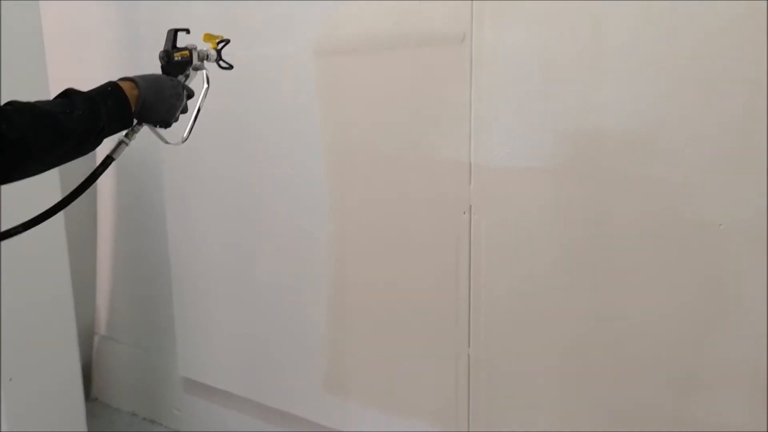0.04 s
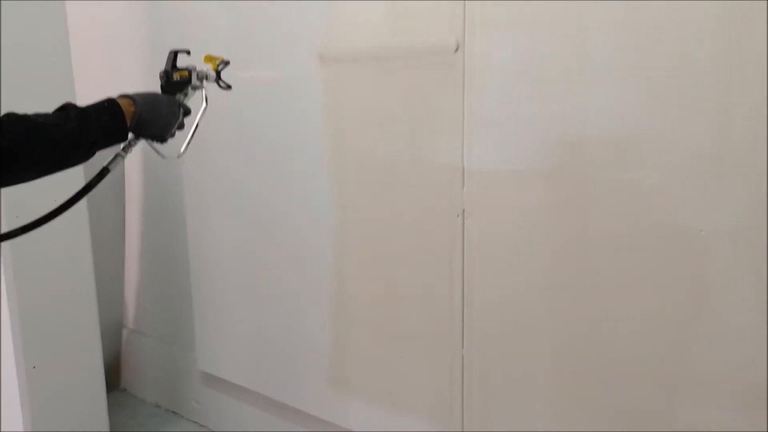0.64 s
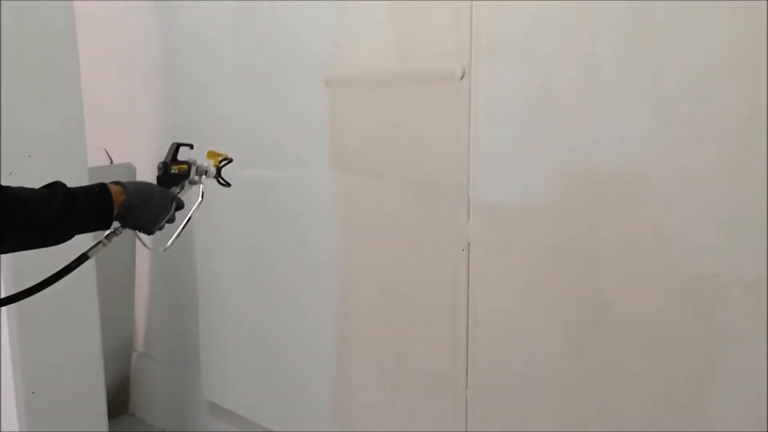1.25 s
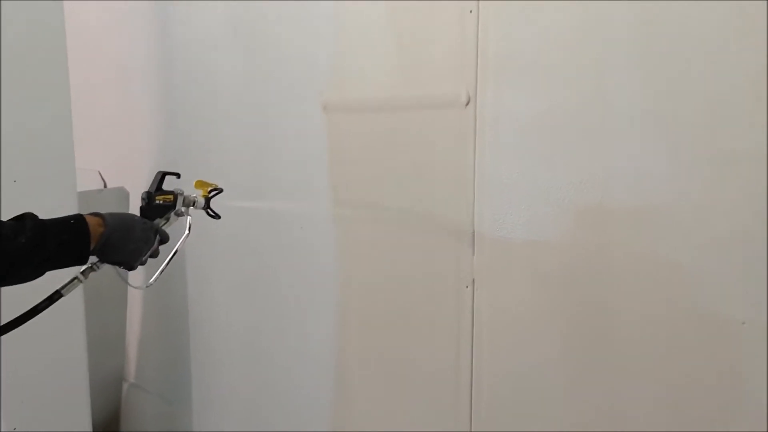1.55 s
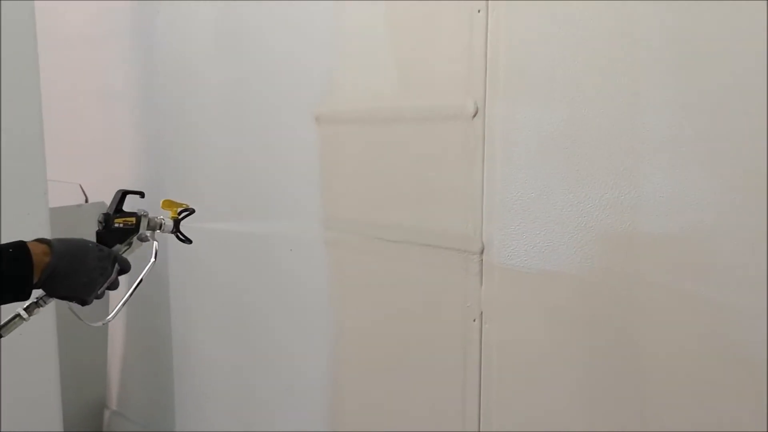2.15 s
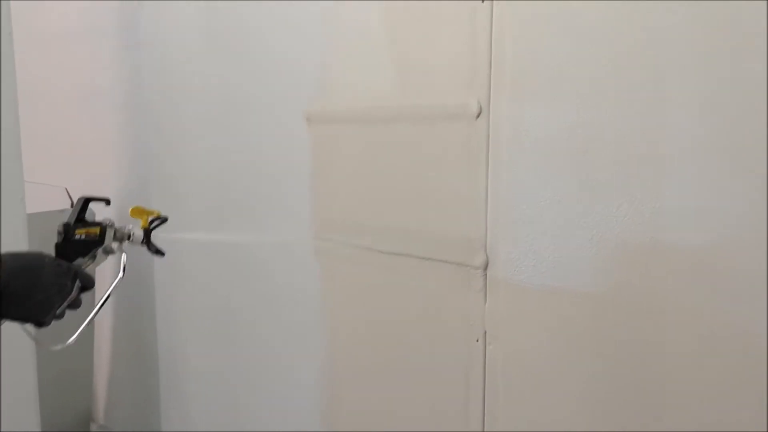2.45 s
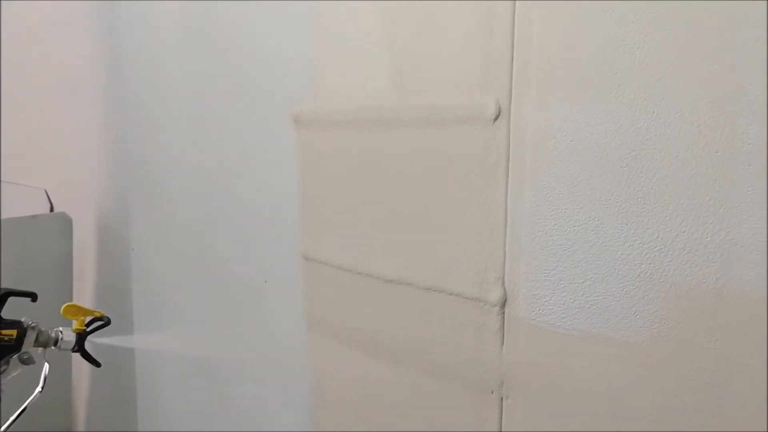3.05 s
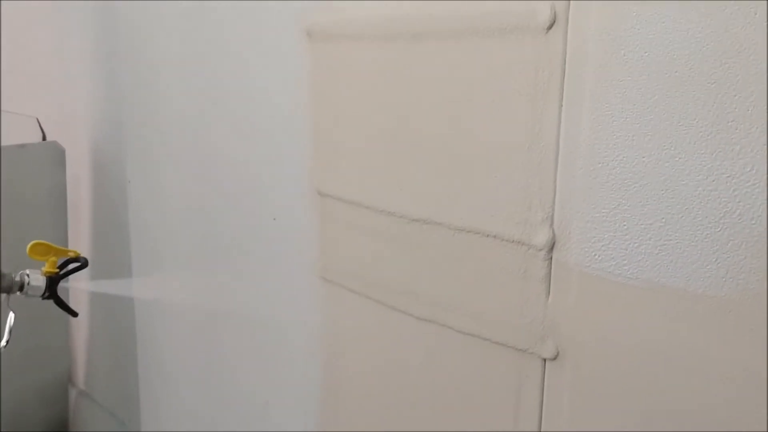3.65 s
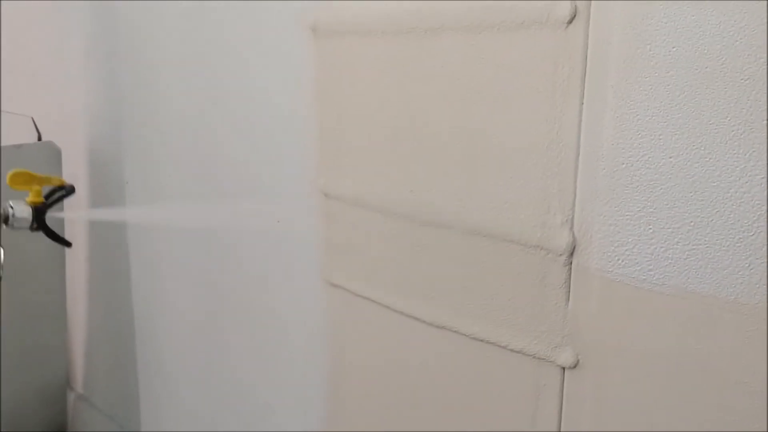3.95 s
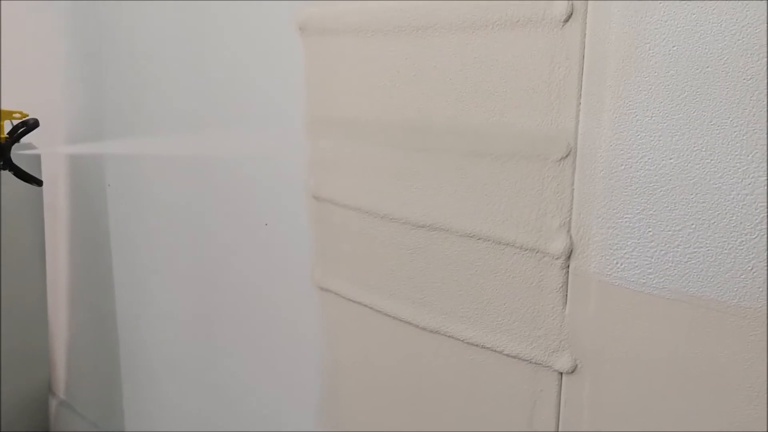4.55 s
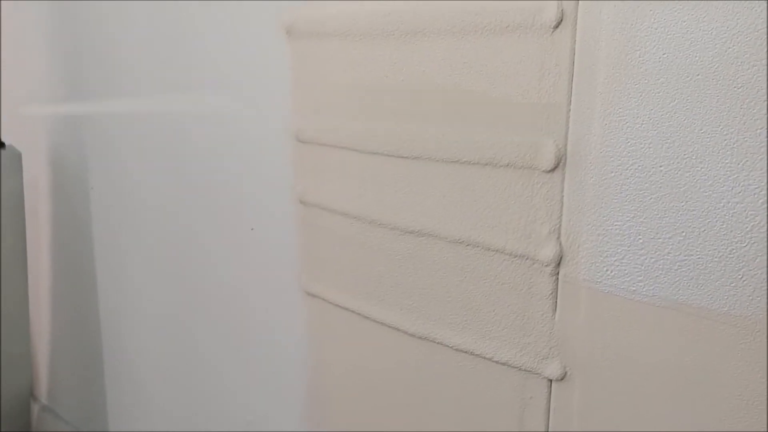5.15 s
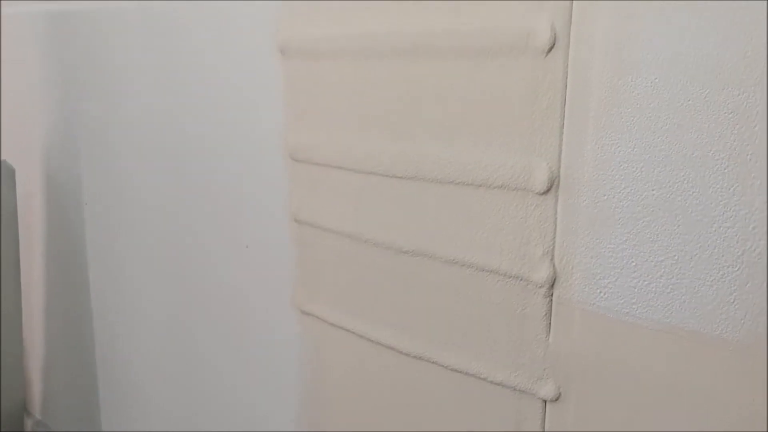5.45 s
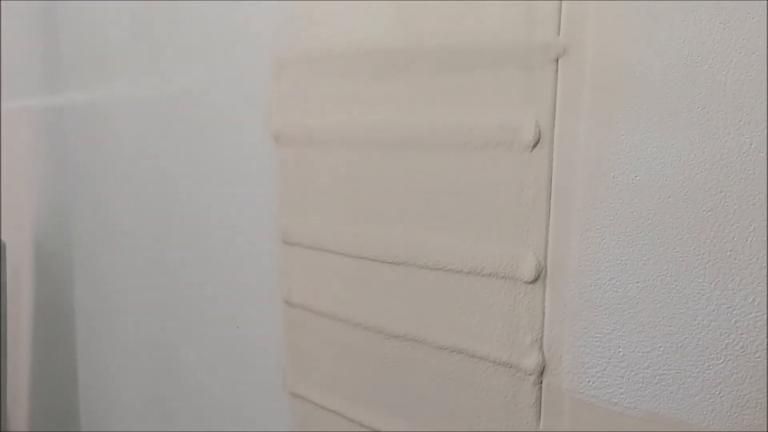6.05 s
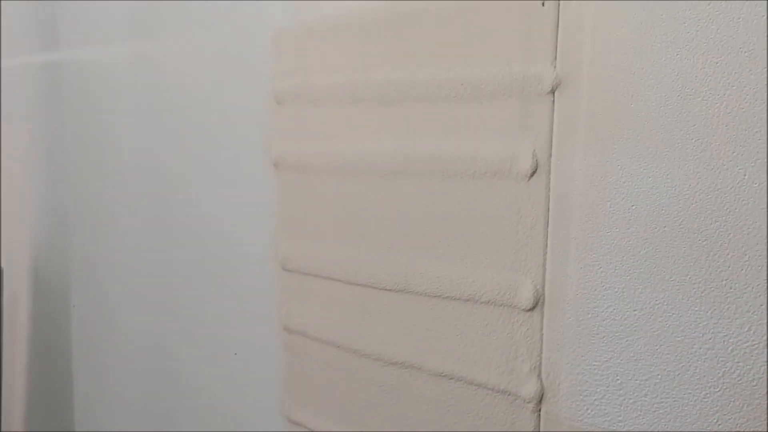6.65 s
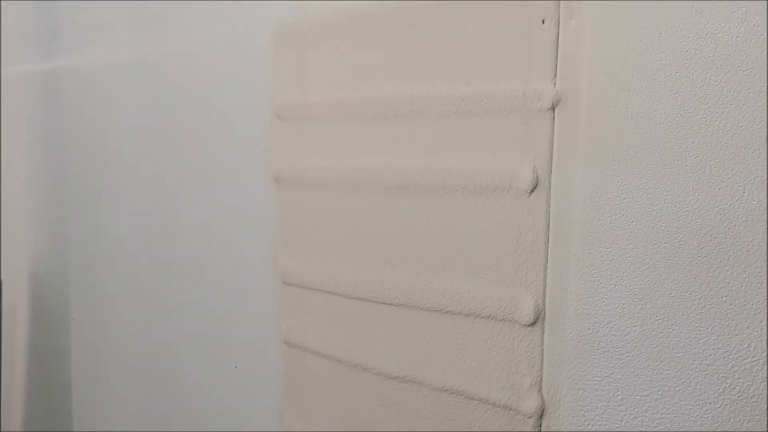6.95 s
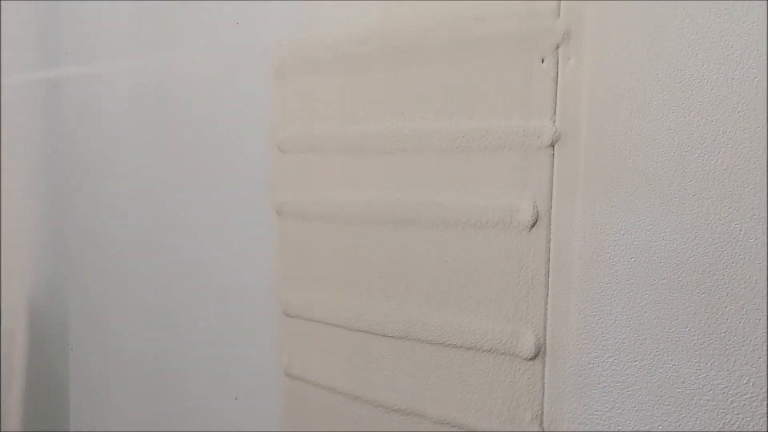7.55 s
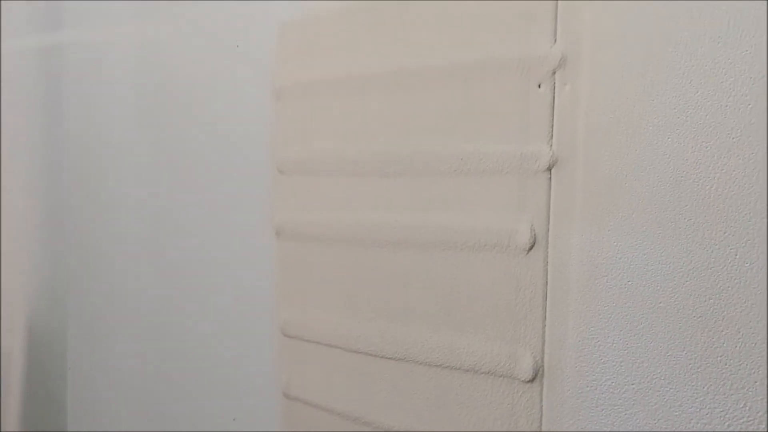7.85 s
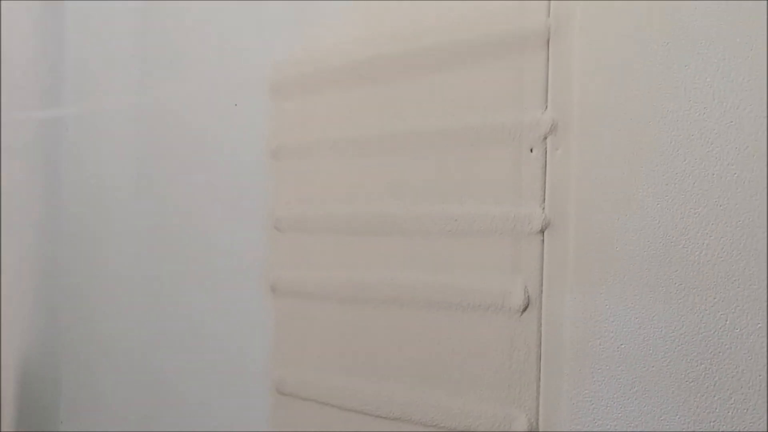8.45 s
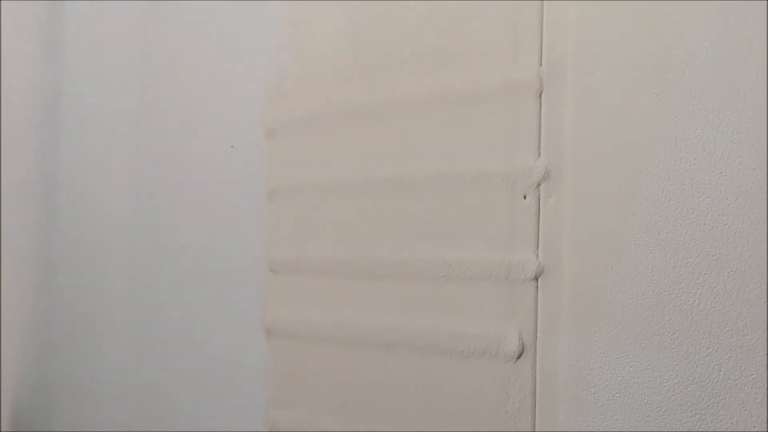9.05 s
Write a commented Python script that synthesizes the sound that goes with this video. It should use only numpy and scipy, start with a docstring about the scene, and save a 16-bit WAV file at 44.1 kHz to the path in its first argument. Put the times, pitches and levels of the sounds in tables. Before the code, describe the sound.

From start to finish, a spray gun shoots a high-pressure jet of filler at a wall, making a loud, steady hiss on the left. Slight downward sweeps colour the hiss, and a thin, airy whistle rises and fades three times. Far behind it are the faint, quickly pulsing hum of a pump and the soft rumble of the room.

```python
"""An airless spray gun blasts filler onto an indoor wall, off to the left, for about nine seconds.
From the start the jet hisses over a room rumble, faint low tones and a distant, throbbing piston pump.
Each time the fan lingers it digs a groove in the wet coat, and a band of the hiss sinks as it deepens.
The spray rings narrow resonances: the lower ones sag in pitch at 1 s, and the strongest swells
like a breathy whistle near 1.5, 5 and 7.7 s. The gun is still spraying at the end."""
import sys
import numpy as np
from scipy import signal
from scipy.fft import rfft, irfft, next_fast_len
from scipy.io import wavfile
from scipy.ndimage import map_coordinates

SR = 44100
rng = np.random.default_rng(int(sys.argv[2]) if len(sys.argv) > 2 else 0)


def transcribe(u):
    """Save the signal u as a 16-bit wav file named by the first command-line argument.

    u: samples, shape (n,) or (channels, n), limited to [-1, 1]; the rate is SR.
    q: integer samples, one column per channel.
    """
    v = np.clip(np.atleast_2d(u).T, -1, 1)
    q = np.round(v * 32767).astype(np.int16)
    wavfile.write(sys.argv[1], SR, q)


N = 410130
TIME = np.arange(N) / SR


def amp(db):
    """Decibels to gain."""
    return 10 ** (np.asarray(db) / 20)


def unit(x):
    """x at rms 1."""
    return x / np.sqrt(np.mean(x ** 2) + 1e-20)


def along(points, hz):
    """(Hz, value) points read on a log axis."""
    knots_hz, values = np.transpose(points)
    return np.interp(np.log(hz + 1), np.log(knots_hz + 1), values)


def curves(rows, t=TIME):
    """Each value column of a timed table at times t."""
    knots_s, *columns = np.transpose(rows)
    return [np.interp(t, knots_s, column) for column in columns]


def wobble(knots_per_s, t=TIME):
    """A smooth random curve."""
    return map_coordinates(rng.standard_normal(size=1024), [t * knots_per_s], mode="wrap")


def filtered(x, response):
    """x through a complex frequency response."""
    size = next_fast_len(N + SR // 2)
    return irfft(rfft(x, size) * response(np.fft.rfftfreq(size, 1 / SR)), size)[..., :N]


def resonance(hz, centre_hz, width_hz):
    """Response of one damped mode."""
    return 1j * hz * width_hz / (centre_hz ** 2 - hz ** 2 + 1j * hz * width_hz)


def bell(hz, centre_hz, octaves):
    """Gaussian band on a log axis, peak 1."""
    return np.exp(-.5 * (np.log2((hz + 1) / centre_hz) / octaves) ** 2)


def bent(x, pitch_ratio):
    """Stereo x with its pitch bent along a curve."""
    return np.array([map_coordinates(side, [np.cumsum(pitch_ratio)], mode="mirror") for side in x])


def noise_all_round(response, spread):
    """Low stereo noise of rms 1, nearly alike at both microphones."""
    mid, side = rng.standard_normal((2, N))
    side = filtered(side, lambda hz: np.minimum(spread + hz / 600, 1))
    return unit(filtered(np.array([mid + side, mid - side]), response))


# Room noise floor. Each row: frequency in Hz, relative density in dB.
FLOOR_SPECTRUM = [(20, -15), (60, 7.5), (100, 3), (160, 2), (240, 1), (310, -0.5), (400, -10), (600, -17),
                  (1500, -23)]

def room():
    """A deep, slowly swelling rumble under a soft steady floor."""
    rumble = noise_all_round(lambda hz: resonance(hz, centre_hz=28.1, width_hz=18) ** 2, spread=0.045)
    floor = noise_all_round(lambda hz: amp(along(FLOOR_SPECTRUM, hz)), spread=0.15)
    return rumble * amp(-52 + 2.2 * wobble(2)) + floor * amp(-51)


# Low tones. Each row: start and end in seconds, start and end pitch in Hz, top level in dB.
LOW_TONES = [(.34, 1.5, 96, 96, -55), (2.4, 3.7, 32, 36, -52), (5, 6.1, 57, 54, -50),
             (5.2, 10, 58, 62, -54), (6.75, 7.85, 51.5, 46, -42), (8.1, 9.6, 61, 66, -51.5)]

def low_tones():
    """Faint low tones come and go, wavering and gliding a little."""
    sound = np.zeros(N)
    for start_s, end_s, start_hz, end_hz, db in LOW_TONES:
        progress = np.clip((TIME - start_s) / (end_s - start_s), 0, 1)
        hz = start_hz + (end_hz - start_hz) * progress + .5 * wobble(5)
        swell = np.sqrt(np.abs(np.sin(np.pi * progress)))
        sound += amp(db) * swell * np.sqrt(2) * np.sin(2 * np.pi * np.cumsum(hz) / SR)
    return sound


# Motor load over one piston stroke. Each row: phase 0-1, relative load in dB at throb 1.
STROKE_LOAD = [(.04, -6), (.22, -11), (.33, -10), (.48, -2.5), (.64, -6), (.8, -1)]
# Pump levels. Each row: time in seconds, hum in dB, housing in dB, throb as a multiple of STROKE_LOAD.
PUMP_LEVELS = [(0, -49, -53, 1.5), (2.1, -55.5, -57, 1.1), (3, -47.5, -57, 0.55), (4.3, -48.5, -56, 1.1),
               (7, -46, -53, 0.77), (9.3, -48, -55.5, 1)]

def pump(stroke_hz=3.7037, hum_hz=200):
    """The motor hums at a mains harmonic, louder under load; every stroke shakes the housing alike."""
    hum_db, housing_db, throb = curves(PUMP_LEVELS)
    phase = TIME * stroke_hz % 1
    knots, load_db = np.transpose(STROKE_LOAD)
    load = unit(amp(throb * np.interp(phase, knots, load_db - load_db.mean(), period=1)))
    hum = np.sqrt(2) * np.sin(2 * np.pi * hum_hz * TIME)
    shake = rng.standard_normal(size=SR)[(phase * SR / stroke_hz).astype(int)]
    housing = unit(filtered(shake, lambda hz: resonance(hz, centre_hz=203, width_hz=63) ** 3))
    return load * (hum * amp(hum_db) + housing * amp(housing_db))


# Sound arriving straight from the jet. Each row: frequency in Hz, amplitude share 0-1.
DIRECT_SHARE = [(600, 0.1), (1700, 0.34), (2400, 0), (5000, 0.53), (8500, 0.8), (12000, 0.3)]
# The right microphone faces away. Each row: frequency in Hz, gain over the left in dB.
RIGHT_SHADOW = [(400, -0.5), (750, -10), (1200, -7.1), (2300, -8.5), (2800, -8), (4000, -11.5), (5200, -11),
                (6400, -21.5), (8000, -29), (9500, -30), (11700, -26.2), (14500, -19.5)]

def noise_from_left(lag_s=24.6 / SR):
    """Stereo noise: the direct part reaches the right microphone late, the room's part is unrelated."""
    left, diffuse = rng.standard_normal((2, N))
    share = lambda hz: np.clip(along(DIRECT_SHARE, hz), 0, 1)
    direct = filtered(left, lambda hz: share(hz) * np.exp(-2j * np.pi * hz * lag_s))
    reflected = filtered(diffuse, lambda hz: np.sqrt(1 - share(hz) ** 2))
    right = filtered(direct + reflected, lambda hz: amp(along(RIGHT_SHADOW, hz)))
    return np.array([left, right])


# Narrow resonances. Each row: centre in Hz, width in Hz, relative level in dB.
RING_MODES = [(604, 30, -19.5), (712, 13, -10), (926, 15.4, -2.5), (1080, 29, -7.5), (1240, 47, -5.5),
              (1536, 65, -8)]

def ringing(sharp_share=.02, sag_at_s=1.0, sag_time_s=.12):
    """The spray keeps narrow resonances sounding, a little unevenly; they start sharp, then sag."""
    def modes(hz):
        return np.sqrt(sum(np.abs(amp(db) * resonance(hz, centre_hz, width_hz) ** 2) ** 2
                           for centre_hz, width_hz, db in RING_MODES))

    pitch_ratio = 1 + sharp_share * (1 - np.tanh((TIME - sag_at_s) / sag_time_s)) / 2
    rings = bent(filtered(noise_from_left(), modes), pitch_ratio)
    return unit(rings) * amp(-46.5 + 0.7 * wobble(5.7))


# Swells of the whistle. Each row: time in seconds, level in dB before gain_db.
WHISTLE_LEVELS = [(0.0, -42), (0.31, -50), (1.35, -46), (1.55, -35), (1.63, -43.5), (4.22, -43.5),
                  (4.95, -36.5), (5.67, -43.5), (7.17, -47), (7.67, -40.5), (9.2, -44.5), (9.3, -39)]

def whistle(gain_db=4):
    """The strongest resonance rung by the spray wanders and swells like a breathy whistle."""
    tone = filtered(noise_from_left(), lambda hz: resonance(hz, centre_hz=1770, width_hz=45) ** 2)
    tone = bent(tone, 1 + .004 * wobble(3))
    return unit(tone) * amp(curves(WHISTLE_LEVELS)[0] + gain_db)


def wall_combs(hz, t, strength=0.081, drift_s=.00006, count=7):
    """Reflections comb the hiss, and the combs slide as the gun moves."""
    delays_s = [mean_s + drift_s * wobble(0.786, t) for mean_s in np.geomspace(.003, .02, count)]
    reflections = sum(np.exp(-2j * np.pi * hz * delay_s) for delay_s in delays_s)
    return np.abs(1 + strength * reflections)


# Grooves where the fan lingers.
# Each row: start in seconds, length in seconds, final depth in mm, lift in dB before fade and depth loss.
WALL_GROOVES = [(-.37, 1.17, 44, 5.5), (0.607, 0.84, 10.4, 3), (1.387, 1.12, 39, 4), (2.66, 1.33, 24, 2.5),
                (3.82, 0.26, 17, 2), (4.082, 1.63, 70, 4), (5.13, .21, 11, 5.4), (5.566, 0.85, 30, 4.5),
                (6.65, 1.01, 24, 3.5), (7.88, 0.96, 24.4, 3.5)]

def groove_lift_db(hz, t, dent_mm=5.2, dig_power=1.48, loss_power=0.49, fade_s=0.052):
    """Each groove rings as a quarter-wave cavity, so its broad resonance sinks as the jet digs deeper."""
    sound_mm_per_s = 343000
    lift_db = np.zeros((len(hz), len(t)))
    for start_s, length_s, final_mm, db in WALL_GROOVES:
        age_s = np.clip(t - start_s, 0, length_s)
        # The fan dents the coat at once; the groove traps the jet and deepens ever faster.
        depth_mm = dent_mm + (final_mm - dent_mm) * (age_s / length_s) ** dig_power
        centre_hz = sound_mm_per_s / (4 * depth_mm)
        fade = np.clip(np.minimum(age_s, length_s - age_s) / fade_s, 0, 1)
        depth_loss = (dent_mm / depth_mm) ** loss_power
        lift_db += db * fade * depth_loss * bell(hz, centre_hz, octaves=.38)
    return lift_db


# Spectrum of the hiss. Each row: frequency in Hz, relative density in dB.
HISS_SPECTRUM = [(300, -36), (450, -34), (650, -25), (1050, -17.5), (1400, -16), (2000, -8.5), (3200, -10),
                 (4600, -8), (5600, -4), (6400, -4.5), (7700, -0.5), (9000, -2.5), (10300, -16.5),
                 (15000, -23.5)]
# Resonances that colour the jet. Each row: centre in Hz, width in Hz, lift in dB.
TIP_MODES = [(2566, 480, 4), (5760, 420, 0.6), (7670, 420, 1.5), (8740, 410, 0.5)]
# Two shifting bands of the hiss. Each row: time in seconds, treble lift in dB, sizzle lift in dB.
BAND_LIFTS = [(0, -2.5, -3), (.55, 0.7, 0.5), (.8, 1, 0.5), (1.55, -0.2, 0.5), (1.8, -0.3, -0.5),
              (2.6, 1.5, 3.5), (2.8, 1.2, 0.5), (3.8, 3, 1.5), (4.4, 1.1, -0.6), (9.3, 1.5, -0.1)]
# Drift of the gun. Each row: time in seconds, level in dB before gain_db,
# left minus right in dB (only its swing about the mean is used).
GUN_DRIFT = [(0, -23, 17), (1.3, -23.5, 19), (2.7, -22.5, 18.5), (3.75, -22.5, 17.5), (4.6, -22, 19),
             (5.5, -22.5, 18.5), (6.5, -22.5, 19), (7.3, -22.5, 19.5), (7.75, -22.5, 19.5),
             (8.4, -22.5, 20), (9.3, -22.5, 19.5)]

def jet(gain_db=3):
    """Filler tears into droplets at the nozzle and scours the wall."""
    hz, t, spectra = signal.stft(noise_from_left(), SR, nperseg=2048)
    hz = hz[:, None]
    treble_db, sizzle_db = curves(BAND_LIFTS, t)
    treble = np.clip((hz - 7000) / 4500, 0, 1)
    sizzle = bell(hz, centre_hz=5740, octaves=.22)
    bands_db = treble * treble_db + sizzle * sizzle_db
    tip_db = sum(db * np.abs(resonance(hz, centre, width)) ** 2 for centre, width, db in TIP_MODES)
    colour = amp(along(HISS_SPECTRUM, hz) + tip_db + groove_lift_db(hz, t) + bands_db)
    spectra = spectra * colour * wall_combs(hz, t)
    pan_db = curves(GUN_DRIFT, t)[1]
    spectra[1] *= amp(pan_db.mean() - pan_db)  # the right side opens as the gun comes near
    hiss = unit(signal.istft(spectra, nperseg=2048)[1][:, :N])
    flutter_db = 0.39 * wobble(110)  # the sheet of filler breaks up unevenly
    return hiss * amp(curves(GUN_DRIFT)[0] + flutter_db + gain_db)


def scene():
    """The jet and its resonances over pump, low tones and room."""
    return jet() + ringing() + whistle() + pump() + low_tones() + room()


def record(dry):
    """Brick-wall low-pass at 15250 Hz."""
    return filtered(dry, lambda hz: hz < 15250)


dry = scene()
out = record(dry)
transcribe(out)
```